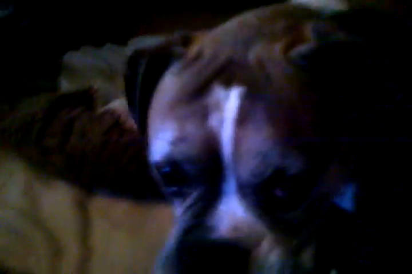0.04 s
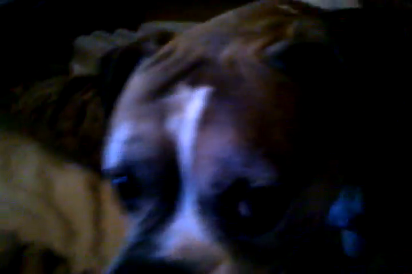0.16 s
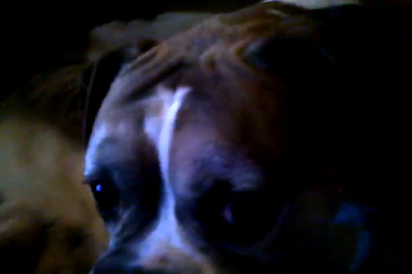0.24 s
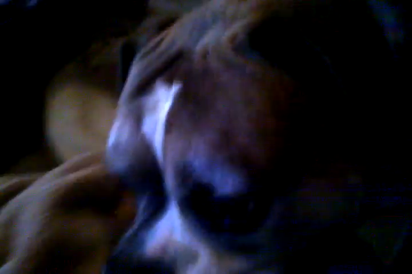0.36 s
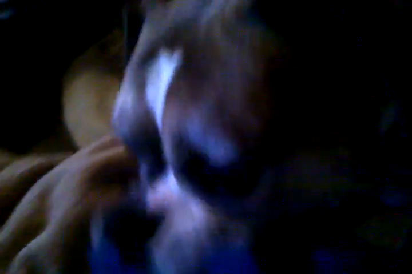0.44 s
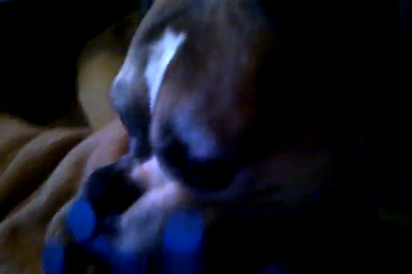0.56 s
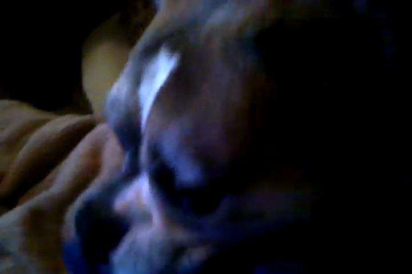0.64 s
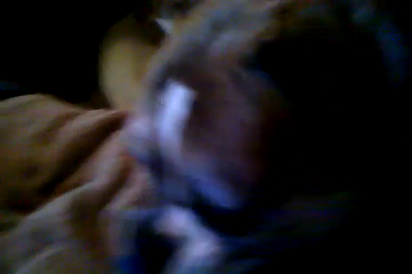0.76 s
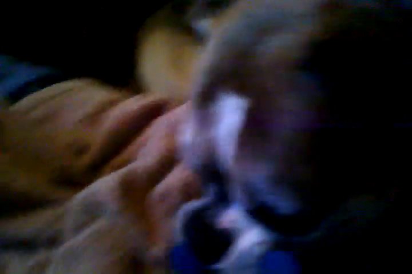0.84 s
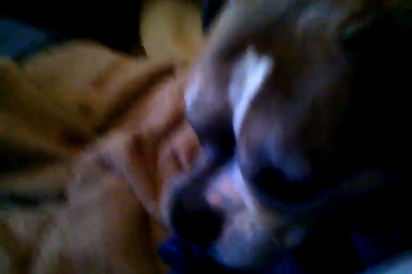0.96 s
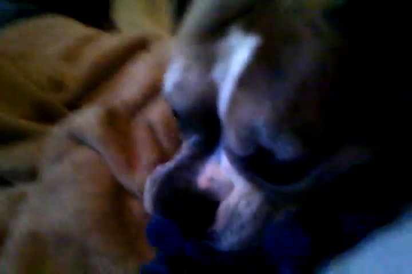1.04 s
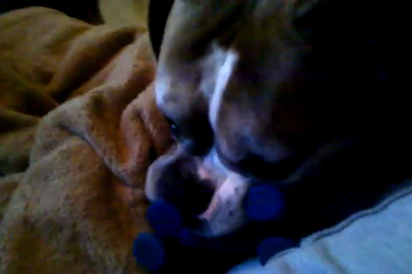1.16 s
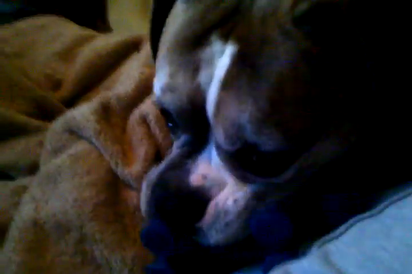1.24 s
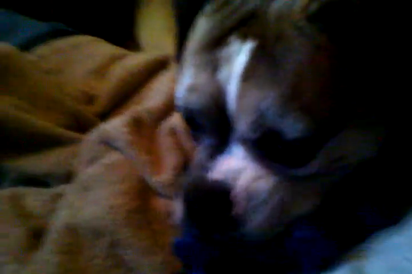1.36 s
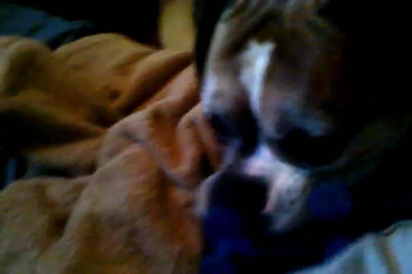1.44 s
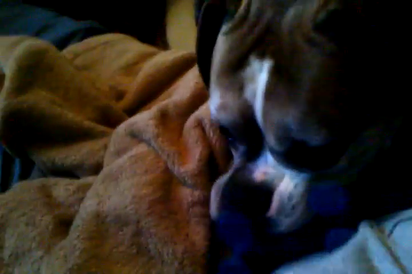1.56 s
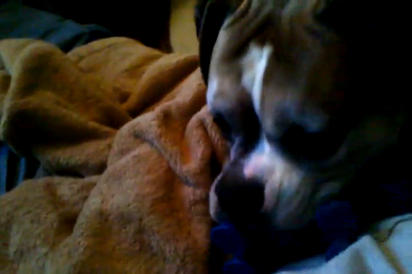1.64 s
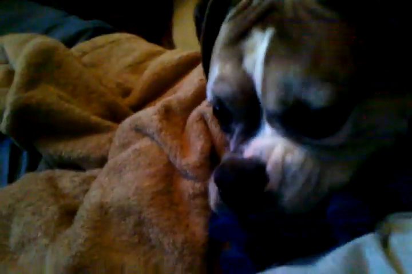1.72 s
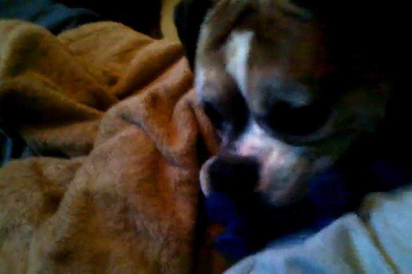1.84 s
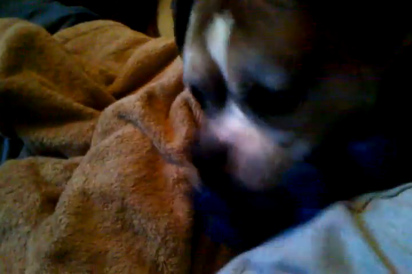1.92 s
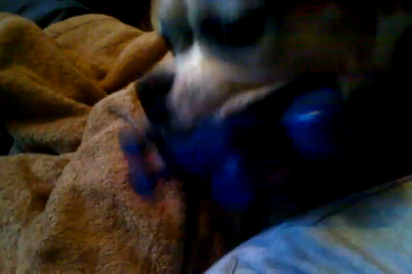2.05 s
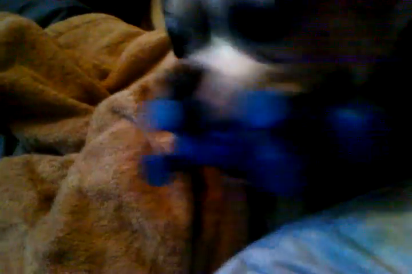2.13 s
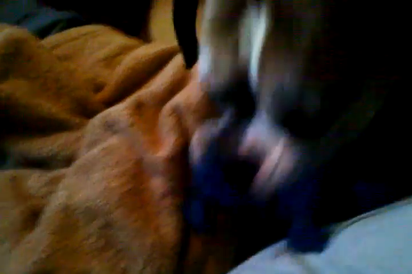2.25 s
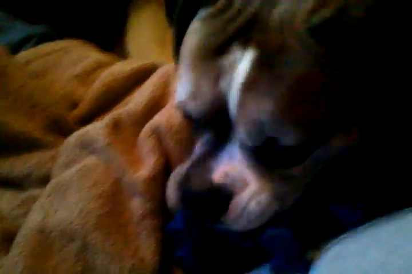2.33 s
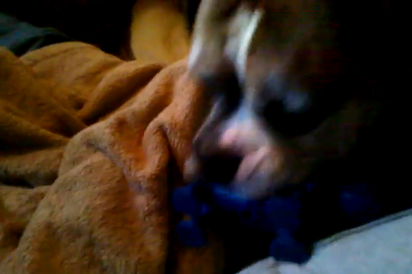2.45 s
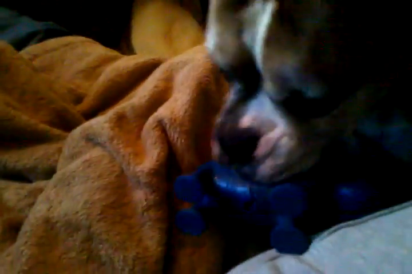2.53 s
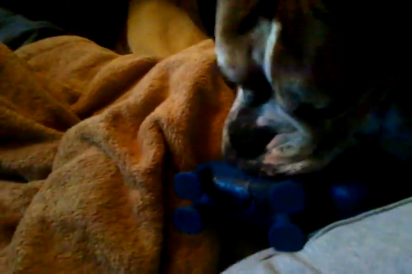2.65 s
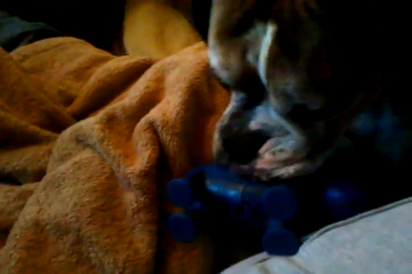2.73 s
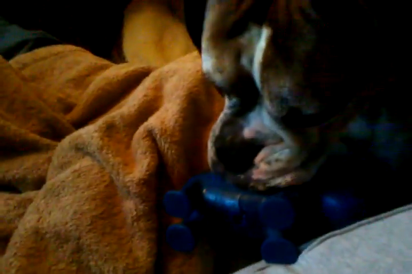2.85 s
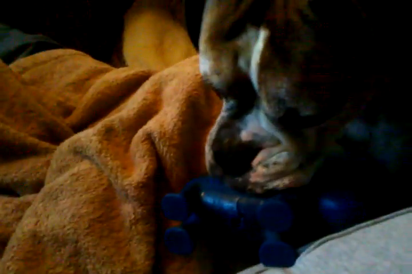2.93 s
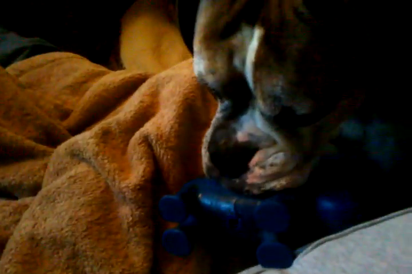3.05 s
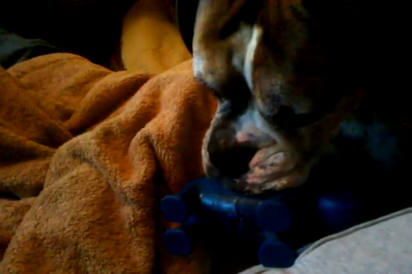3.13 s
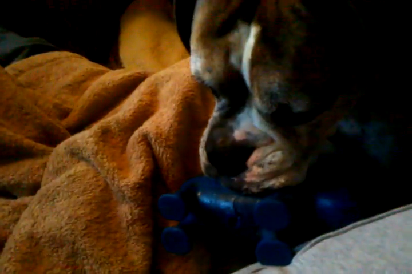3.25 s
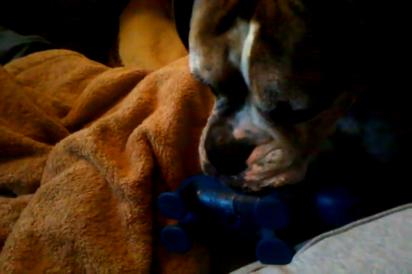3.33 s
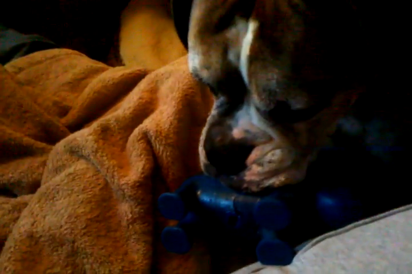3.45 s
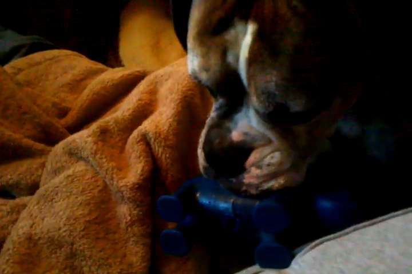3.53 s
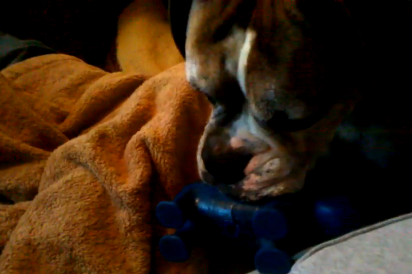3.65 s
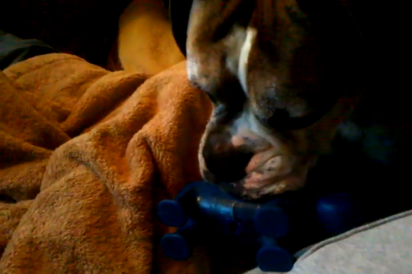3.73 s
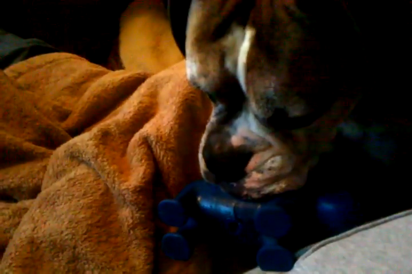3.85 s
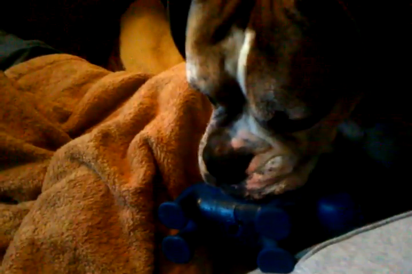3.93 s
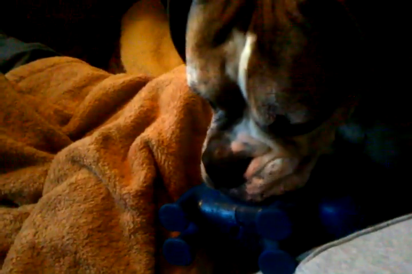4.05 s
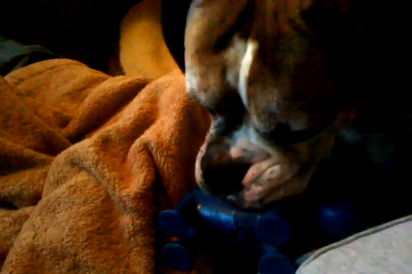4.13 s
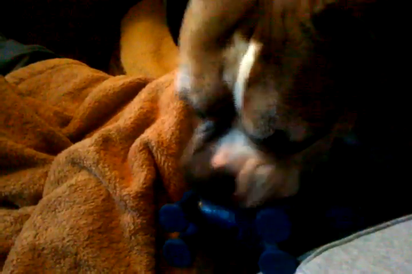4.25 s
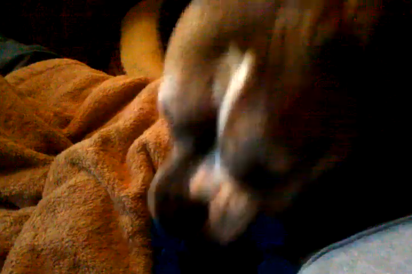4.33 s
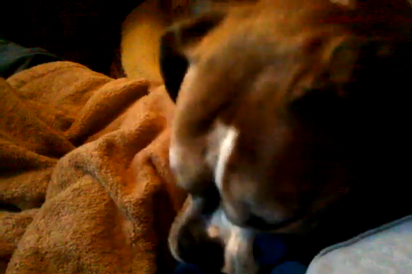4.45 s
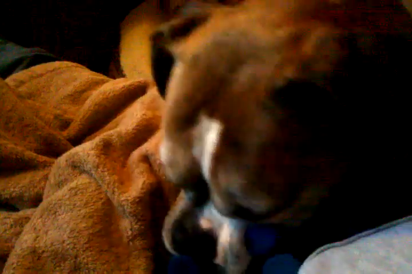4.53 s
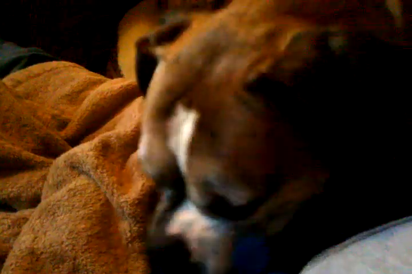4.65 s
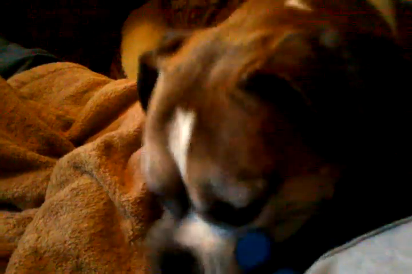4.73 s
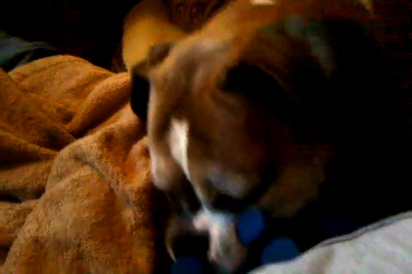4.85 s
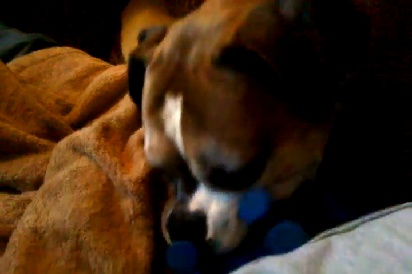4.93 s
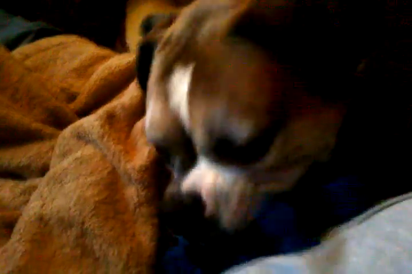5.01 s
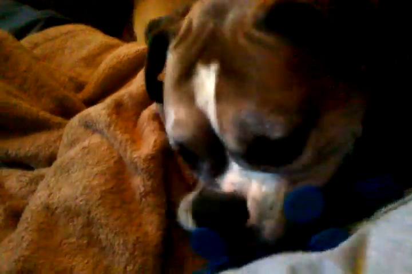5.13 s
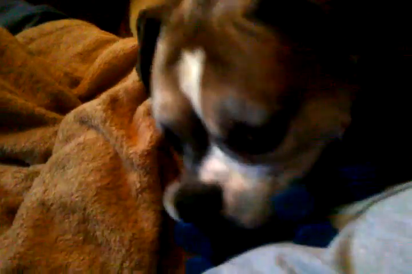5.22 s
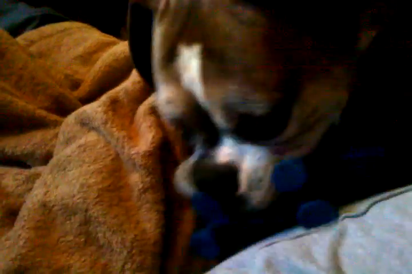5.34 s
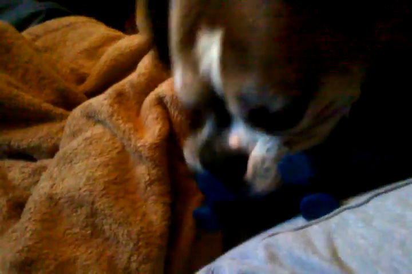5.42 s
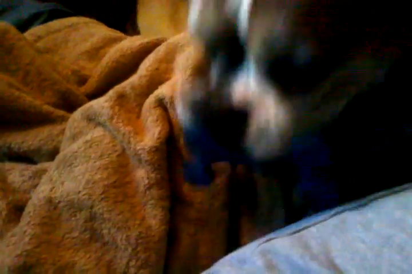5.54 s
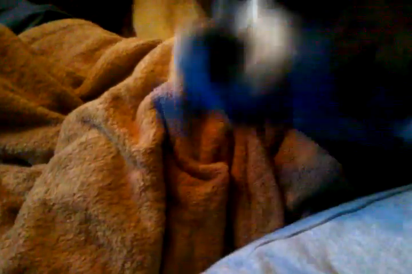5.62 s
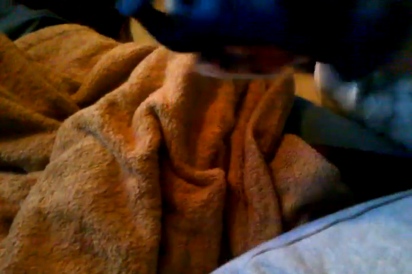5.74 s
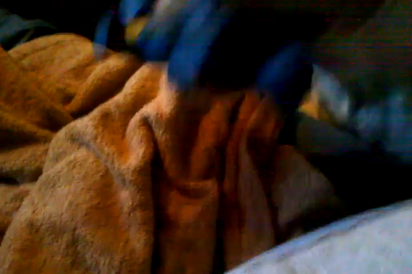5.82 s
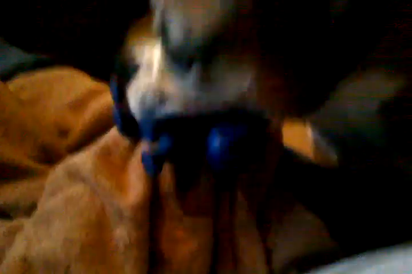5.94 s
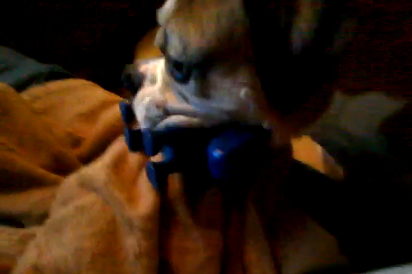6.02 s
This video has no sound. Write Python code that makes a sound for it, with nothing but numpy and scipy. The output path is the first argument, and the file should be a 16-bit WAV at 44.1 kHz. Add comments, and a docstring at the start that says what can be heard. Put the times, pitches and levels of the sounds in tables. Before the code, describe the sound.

A small, quiet room with low, steady still air, heard very close through a modest, band-limited microphone. In the first 0.3 seconds a dog gives tiny nose puffs and faint mouth ticks. From 0.7 to 2.0 it bites a rubber toy rapidly: nine short, shrill, nasal squeaks, each under a tenth of a second, some chirping upward then sagging. Hollow pops knock between them, strongest around 1.3 to 1.8, with fur hiss and cloth rumble. Wet ticks follow, then a weak squeak at 2.4 and a loud, higher one at 2.6. From 2.8 to 4.5 it is nearly silent, a faint low hum swelling late. From 4.6 to 5.5 a low, pulsing growl runs under four squeaks, at 4.7, 4.9, 5.05 and 5.3, two jumping sharply in pitch. A crisp tick, rustling, small sniffs and a soft hum finish by 6.

```python
"""In a quiet room, a dog lies on a blanket, heard close up, and bites a rubber squeaky toy.
Each bite drives air through the toy's reed, made from a stack of sine partials and leaking noise.
The hollow body pops with short falling rings; fur and cloth rustle as shaped, uneven noise.
The dog sniffs in noise puffs, its mouth ticks, and it growls low as pulses ring throat and mouth.
Still air lies under it all, and a faint low hum swells in twice."""
import sys
import numpy as np
from scipy import signal
from scipy.fft import rfft, irfft, next_fast_len
from scipy.io import wavfile
from scipy.ndimage import uniform_filter1d

SR = 44100
rng = np.random.default_rng(int(sys.argv[2]) if len(sys.argv) > 2 else 0)


def dump_mix(stems):
    """Bounce the given channels to the path in sys.argv[1] as a 16-bit WAV at rate SR."""
    frames = np.atleast_2d(stems).T  # one column per channel
    limited = np.clip(frames, -1, 1)  # hard clip at full scale
    pcm = np.round(limited * 32767).astype(np.int16)
    wavfile.write(sys.argv[1], SR, pcm)


N = 268128  # length in samples

# spectrum of the still room, shape only: pitch_hz, level_db (per Hz)
AIR_SPECTRUM = [(18, -79.5), (30, -48.5), (86, -13), (195, -10.5), (230, 0), (277, -17.5), (305, -7),
                (359, -20.5), (394, -11.5), (725, -15), (1030, -11.5), (1810, -22), (2630, -32.5),
                (6540, -32), (8080, -52.5), (10500, -77.5), (17800, -120)]
# air through the nose: start_s, level_db, length_s, low_noise_db (over the nose noise)
SNIFFS = [(0.0335, -47.5, 0.045, -16), (0.1207, -44, 0.021, -8), (0.182, -36, 0.036, -6),
          (4.647, -53, .01, 2), (5.3986, -53, 0.032, 11), (5.486, -55, 0.022, 9), (5.572, -52, 0.019, 1),
          (5.68, -63, 0.015, 14), (5.73, -49, 0.018, -1), (5.893, -53, 0.055, -24),
          (5.9394, -56, 0.017, -3)]
# spectrum of the nose noise, shape only: pitch_hz, level_db (per Hz)
NOSE_SPECTRUM = [(530, -36), (900, 6), (1390, -4), (1940, -15.5), (2370, -2), (3160, -99), (3460, -5),
                 (4000, 7), (5150, -3.5), (6940, 3), (7800, -41), (10100, -83), (17200, -120)]
# wet mouth ticks: start_s, level_db (top of the swell)
TICKS = [(0.2833, -50), (0.316, -44.5), (2.0416, -37), (2.138, -34), (2.2677, -39), (2.8898, -46),
         (4.2642, -47.5), (4.2998, -40), (5.3588, -25)]
# the toy's hollow wall snaps in or out: snap_s (sound follows a little later), level_db,
# ring_hz (where the pitch settles), fall_s (time to fall 60 dB)
POPS = [(0.195, -31.5, 314, 0.036), (0.755, -33, 202, 0.062), (1.003, -27, 240, 0.027),
        (1.212, -32, 348, 0.065), (1.294, -7, 382, 0.042), (1.553, -5, 347, 0.019),
        (1.664, -33.5, 421, 0.066), (1.709, -12, 355, 0.02), (1.766, -6, 345, 0.026),
        (1.791, -14.5, 345.6, 0.035), (2.026, -35, 288, 0.07), (2.267, -26, 426.8, 0.025),
        (2.569, -27, 400, 0.032), (4.659, -29.5, 218, 0.11)]
# spectrum of the high hiss of fur, shape only: pitch_hz, level_db (per Hz)
FUR_SPECTRUM = [(880, -43.5), (1500, -13), (1630, -23), (2180, -12), (2680, -19.5), (3810, -14.5),
                (4850, -29.5), (5840, -6.5), (6660, -7), (7800, -35), (10100, -62.5), (17200, -120)]
# spectrum of cloth rumble, shape only: pitch_hz, level_db (per Hz)
CLOTH_SPECTRUM = [(35, -42.5), (60, -15.5), (139, 0), (464, -3.5), (718, -2.5), (802, -1), (1100, -8.5),
                  (1430, -47), (2420, -120)]
# how loud the high hiss of fur, and of the broad sniff near 5.9 s, is before its uneven grains:
# time_s, level_db
HISS_CURVE = [(0.25, -67), (0.59, -70), (0.7, -66), (0.76, -47), (0.89, -45), (1.41, -51), (1.78, -41),
              (1.94, -58), (2.22, -70), (2.3, -57), (2.44, -46), (2.58, -45), (2.76, -62), (3.5, -72),
              (4.47, -73), (4.57, -56), (4.726, -53), (4.8, -63), (5.05, -46), (5.17, -55), (5.4, -48),
              (5.66, -54), (5.78, -50), (5.9, -39), (6.08, -60)]
# how loud the cloth rumble is before its uneven grains: time_s, level_db
CLOTH_CURVE = [(0.66, -66), (0.76, -52), (0.9, -45), (1.05, -44), (1.17, -53), (1.48, -56), (1.66, -47),
               (1.84, -54), (2.2, -64), (2.36, -50), (2.6, -56), (2.7, -80), (5.5, -80), (5.57, -51),
               (5.69, -48), (5.73, -54), (5.94, -49), (6.08, -60)]
# one bite curve a squeak, before waver, catch, sag and toy outlet:
# time_s, pitch_hz (of the reed), level_db (of the first partial)
SQUEAKS = [
    [(0.717, 1287, -24.9), (0.736, 1334, -21.1), (0.753, 1166, -29.0)],
    [(0.784, 1200, -27.1), (0.794, 1317, -27.3), (0.808, 1179, -25.9)],
    [(0.906, 1388, -16.6), (0.924, 1392, -20.8), (0.948, 1258, -39.0)],
    [(1.061, 1329, -23.5), (1.089, 1316, -22.0), (1.112, 1305, -23.4), (1.133, 1184, -27.6)],
    [(1.197, 1392, -12.8), (1.217, 1482, -13.9), (1.244, 1352, -19.9), (1.268, 1216, -28.9)],
    [(1.356, 1334, -18.5), (1.383, 1308, -17.1), (1.41, 1323, -19.3), (1.432, 1236, -20.7),
     (1.437, 1055, -25.7), (1.448, 1089, -25.0)],
    [(1.515, 1372, -15.4), (1.542, 1523, -10.8), (1.554, 1622, -9.9), (1.562, 1559, -11.4),
     (1.568, 1444, -15.1), (1.58, 1340, -18.6), (1.586, 1314, -15.3), (1.602, 1219, -26.2)],
    [(1.733, 1339, -17.3), (1.751, 1300, -17.1), (1.772, 1330, -18.7), (1.794, 1288, -15.5),
     (1.812, 1277, -17.0), (1.824, 1218, -24.8)],
    [(1.871, 1335, -9.0), (1.883, 1463, -10.2), (1.895, 1594, -11.0), (1.901, 1512, -8.0),
     (1.904, 1448, -15.5), (1.918, 1368, -15.2), (1.957, 1264, -22.2)],
    [(2.365, 1334, -31.9), (2.388, 1291, -27.3), (2.422, 1324, -22.9), (2.427, 1438, -21.4),
     (2.435, 1412, -22.6), (2.447, 1311, -22.1), (2.485, 1317, -24.8), (2.5, 1231, -33.5)],
    [(2.562, 1354, -14.3), (2.572, 1513, -7.9), (2.582, 1664, -12.2), (2.598, 1754, -9.0),
     (2.624, 1661, -14.2), (2.63, 1612, -11.8), (2.648, 1567, -13.0), (2.687, 1353, -16.3),
     (2.723, 1239, -26.2)],
    [(4.69, 1212, -14.5), (4.701, 1369, -11.0), (4.703, 1852, -13.4), (4.709, 1787, -11.2),
     (4.716, 1558, -17.1), (4.717, 1287, -14.4), (4.736, 1262, -14.9), (4.752, 1185, -23.4),
     (4.758, 1013, -19.0)],
    [(4.882, 997, -33.5), (4.89, 1135, -19.4), (4.896, 1181, -24.0)],
    [(5.049, 1251, -14.6), (5.059, 1415, -13.2), (5.061, 1984, -13.3), (5.071, 2148, -12.6),
     (5.079, 1763, -13.3), (5.081, 1282, -17.0), (5.093, 1262, -15.4), (5.098, 1012, -24.1),
     (5.105, 906, -21.1)],
    [(5.272, 1311, -17.3), (5.285, 1340, -12.7), (5.303, 1368, -12.2), (5.323, 1353, -13.6)],
]
# how the jaws shade each squeak, over the first partial, before the toy outlet:
# partial_2_db, partial_3_db, partial_4_db, partial_5_db, partial_6_db
BITE_SHADES = [(-1.3, 6.1, 8.1, 6.6, 6.0), (-2.4, 18.7, 17.2, 4.6, 7.4), (1.4, 14.7, -5.0, 9.3, 13.4),
               (-1.7, 12.7, 9.1, 5.5, 7.9), (-3.6, 8.3, -7.8, -1.6, -5.2), (-14.7, 6.1, 8.8, 0.0, -0.5),
               (-1.9, -0.1, -4.1, -4.0, -4.8), (-7.1, -6.3, 11.1, 7.7, -0.2),
               (-4.0, -5.1, -3.3, -0.3, -4.0), (5.7, 14.2, 14.8, 7.5, 5.5), (-7.0, -3.3, -1.9, -3.8, 4.6),
               (-1.7, -4.9, -4.8, -3.4, -8.2), (-4.8, -20.1, -24.7, -20.3, -21.3),
               (-0.8, -3.3, -4.0, -3.6, -0.5), (-5.5, -5.8, -8.0, -10.0, 9.3)]
# from toy outlet to microphone: pitch_hz, gain_db
OUTLET_PATH = [(900, 1.5), (1300, 0.5), (1800, 1), (2400, 3.35), (2900, -2.5), (3400, 0.2), (3900, 4.5),
               (4500, -13), (4900, -18), (5700, -1), (6300, 4), (6700, 6.5), (7200, -7.5), (7800, -26.5)]
# the reed starts flat and soft: pitch_share, pitch_time_s, level_db, level_time_s
REED_CATCH = (.17, .0013, -14, .0013)
# the reed sags as the air runs out: pitch_share, pitch_time_s, level_db, level_time_s
REED_SAG = (.12, .004, -14, .0028)
# low hum swells: start_s, end_s, pitch_hz, start_level_db, end_level_db (before the waver)
HUM_SWELLS = [(4.15, 4.56, 98, -70, -60), (5.55, 6.08, 111.5, -62, -54)]
# growl: time_s, pitch_hz (before jitter), level_db, mouth_opening_db (mouth over throat)
GROWL_CURVE = [(4.52, 82, -61, -2), (4.678, 72.5, -39.5, -3), (4.726, 76.5, -39, -6.5), (4.8, 75, -43, -9),
               (4.85, 75, -51, -8), (4.885, 75, -40, -12), (4.93, 75.5, -44, -9), (4.968, 79, -41, -6),
               (5.032, 105, -31.5, -8), (5.092, 97, -37.5, -6), (5.168, 76.4, -44, -5),
               (5.24, 74.5, -44, -4), (5.29, 75, -37, -7), (5.348, 88, -33.5, -4), (5.41, 83.5, -37.5, -5),
               (5.5, 74.7, -39.5, -2.5), (5.525, 75, -58, -2)]
# chest and throat resonances: pitch_hz, width_hz (of each of two passes), gain_db
THROAT_RINGS = [(90, 40, -11), (160, 89, -3), (250, 77, 1.5)]
# open mouth resonances: pitch_hz, width_hz (of each of two passes), gain_db
MOUTH_RINGS = [(450, 120, 0), (590, 130, -2), (840, 130, 1), (1190, 200, -26.5)]

AIR_DB = -53
THUMP_HZ, THUMP_DB = 180, -14  # the blanket under the toy gives with each pop
# air past the reed, under the strongest low partial; its extra burst before the reed catches
BREATH_DB, CHIFF_DB, CHIFF_S = -30, 20, 0.002
PARTIAL_TOP_HZ = 8000  # partials from here up stay silent
HUM_WAVER_DB, HUM_WAVER_PER_S = 3, 9
GROWL_ROUGHNESS = 0.33  # puffs of air against the slaps
ROOM_T60_S, ROOM_DB = 0.55, -28.5
NEAR_T60_S, NEAR_DB = 0.12, -21
TOP_HZ = 9300  # the last filter cuts above this


def undb(db):
    """Turns decibels into a plain gain."""
    return 10 ** (np.asarray(db) / 20)


def level(x, db=0):
    """Scales x to an rms level in dB."""
    return x * undb(db) / np.sqrt(np.mean(x ** 2))


def shade(table, hz):
    """Reads the dB of a pitch_hz, level_db table at hz, along a log pitch scale."""
    table_hz, db = np.transpose(table)
    return np.interp(np.log(np.maximum(hz, 1)), np.log(table_hz), db)


def noise(table):
    """Noise of rms 1 with the given spectrum."""
    size = next_fast_len(N)
    hz = np.arange(size // 2 + 1) * SR / size
    white_spectrum = rfft(rng.standard_normal(size))
    return level(irfft(white_spectrum * undb(shade(table, hz)), size)[:N])


def walk(rate):
    """A smooth random wander, from steps of 1 / rate s averaged twice; spread near 1."""
    step = int(SR / rate)
    held = np.repeat(rng.standard_normal(N // step + 1), step)
    smooth = uniform_filter1d(uniform_filter1d(held, step), step)
    return 1.3 * smooth[:N]


def ring(x, hz, width):
    """One resonance, gain 1 at its centre."""
    return signal.lfilter(*signal.iirpeak(hz, hz / width, fs=SR), x)


def ring_twice(x, hz, width):
    """The same resonance passed twice, so it is more selective."""
    return ring(ring(x, hz, width), hz, width)


def add(out, s, x):
    """Mixes x into out from time s."""
    i = int(s * SR)
    out[i:i + len(x)] += x[:N - i]


def play(rows, t):
    """Gain from a time_s, level_db curve, down at -120 dB outside it."""
    return undb(np.interp(t, *np.transpose(rows), -120, -120))


def still_air():
    """The still room is steady shaped noise whose level drifts slightly."""
    return undb(AIR_DB + 0.77 * walk(8)) * noise(AIR_SPECTRUM)


def sniffs():
    """Air rushing through the nose makes short puffs of noise."""
    out, t = np.zeros(N), np.arange(SR // 5) / SR
    nose_noise = noise(NOSE_SPECTRUM)
    low_noise = level(ring_twice(rng.standard_normal(N), 2250, 1200))
    for s, db, length_s, low_db in SNIFFS:
        at = (int(s * SR) + np.arange(len(t))) % N
        u = 2.6 * t / length_s
        puff = u * np.exp(1 - u) ** 1.2  # quick swell, slower fall
        add(out, s, undb(db) * puff * (nose_noise[at] + undb(low_db) * low_noise[at]))
    return out


def ticks(tick_s=0.0005):
    """Lips and teeth tick: a high tone swells and dies within a few thousandths of a second."""
    out, t = np.zeros(N), np.arange(SR // 5) / SR
    swell = np.e * t / tick_s * np.exp(-t / tick_s)
    tick = swell * np.sin(2 * np.pi * 6200 * t)
    for s, db in TICKS:
        add(out, s, undb(db) * tick)
    return out


def pops(lag_s=0.0017, glide=2.5, glide_s=0.0006, rise_s=0.0006, flutter=0.25):
    """The wall snaps with a high first swing that falls into the body's short, unsteady low ring."""
    out, t = np.zeros(N), np.arange(SR // 8) / SR
    shake = level(ring_twice(rng.standard_normal(N), 300, 250))
    thump = undb(THUMP_DB) * np.sin(2 * np.pi * THUMP_HZ * t)
    for s, db, hz, t60 in POPS:
        turns = hz * (t + glide * glide_s * (1 - np.exp(-t / glide_s)))
        own_shake = np.roll(shake, -int(s * SR))[:len(t)]
        unsteady = flutter * own_shake * np.minimum(t * hz / 2, 1)  # grows in over two swings
        swing = np.sin(2 * np.pi * turns) + thump + unsteady
        rise_and_fall = 1000 ** (-t / t60) * (1 - np.exp(-t / rise_s))
        add(out, s + lag_s, undb(db) * swing * rise_and_fall)
    return signal.sosfilt(signal.butter(2, 100, "high", fs=SR, output="sos"), out)


def blanket_and_hiss(t):
    """Fur, and a broad sniff near 5.9 s, hiss high and cloth rumbles, all in uneven grains."""
    hiss = noise(FUR_SPECTRUM) * undb(2.8 * walk(34))
    cloth = noise(CLOTH_SPECTRUM) * undb(2.5 * walk(35))
    return hiss * play(HISS_CURVE, t) + cloth * play(CLOTH_CURVE, t)


def squeaks(edge_s=0.001, flutter_db=1.0, waver=0.003):
    """The reed sings a clean stack that follows the bite pressure; a little air leaks past it."""
    out = np.zeros(N)
    flutter, drift = walk(140), walk(160)
    leak = noise([(600, -41)] + OUTLET_PATH + [(9000, -59.5)])
    for rows, shades in zip(SQUEAKS, BITE_SHADES):
        s, hz, db = np.transpose(rows)
        at = np.arange(int((s[0] - edge_s) * SR), int((s[-1] + edge_s) * SR))
        t = at / SR
        pitch = np.interp(t, s, hz) * (1 + waver * drift[at])
        loud_db = np.interp(t, s, db)
        for bend, away in ((REED_CATCH, t - s[0]), (REED_SAG, s[-1] - t)):
            share, bend_s, drop_db, drop_s = bend
            away = np.maximum(away, 0)  # seconds from that end of the squeak
            pitch = pitch * (1 - share * np.exp(-away / bend_s))
            loud_db = loud_db + drop_db * np.exp(-away / drop_s)
        turn = 2 * np.pi * np.cumsum(pitch) / SR
        chiff_db = CHIFF_DB * np.exp(-(t - t[0]) / CHIFF_S)
        breath_db = BREATH_DB + max(0, *shades[:4]) + chiff_db
        stack = undb(breath_db) * leak[at]
        for k, over_db in enumerate((0, *shades), 1):
            # each partial reads the flutter half a second further on
            own_flutter = flutter_db * flutter[(at + k * SR // 2) % N]
            gain = undb(over_db + shade(OUTLET_PATH, k * pitch) + own_flutter)
            heard = k * pitch < PARTIAL_TOP_HZ
            stack = stack + heard * gain * np.sin(k * turn + k * k * np.pi / 5)
        gate = np.clip(np.minimum(t - t[0], t[-1] - t) / edge_s, 0, 1)
        out[at] += stack * gate * undb(loud_db)
    return out


def hum(t, fade_s=0.03):
    """A soft low tone whose level wavers."""
    out = np.zeros(N)
    waver = undb(HUM_WAVER_DB * walk(HUM_WAVER_PER_S))
    for s, end, hz, db, end_db in HUM_SWELLS:
        fade = np.clip(np.minimum(t - s, end - t) / fade_s, 0, 1)
        swell = undb(np.interp(t, (s, end), (db, end_db)))
        out += np.sin(2 * np.pi * hz * t) * fade * swell
    return out * waver


def resonate(source, modes):
    """Side-by-side resonances of a cavity, added with alternating sign, at rms 1."""
    total = np.zeros(N)
    for k, (hz, width, db) in enumerate(modes):
        total += (-1) ** k * undb(db) * ring_twice(source, hz, width)
    return level(total)


def growl(t, jitter=0.023, scatter_db=2.6):
    """Slow vocal fold slaps, with a puff of air after each, ring the throat and the mouth."""
    s, hz, db, open_db = np.transpose(GROWL_CURVE)
    turns = np.cumsum(np.interp(t, s, hz) * (1 + jitter * walk(70))) / SR
    slaps = np.diff(np.floor(turns), prepend=0) * undb(scatter_db * walk(70))  # one per whole turn
    puffs = level(np.exp(-(turns % 1) / 0.3) * rng.standard_normal(N))
    folds = level(slaps) + GROWL_ROUGHNESS * puffs
    throat = resonate(folds, THROAT_RINGS)
    mouth = resonate(folds, MOUTH_RINGS) * undb(np.interp(t, s, open_db))
    return (throat + mouth) * undb(np.interp(t, s, db, -120, -120))


def room(x, gap_s=0.004, treble_share=0.79):
    """Quick returns from things close by, then a faint diffuse tail with shorter treble."""
    t = np.arange(int(0.8 * SR)) / SR
    white = rng.standard_normal(len(t))
    dull = signal.lfilter(*signal.butter(2, 2500, fs=SR), white)
    treble = white - dull
    far = dull * 1000 ** (-t / ROOM_T60_S) + treble * 1000 ** (-t / (treble_share * ROOM_T60_S))
    near = white * 1000 ** (-t / NEAR_T60_S)
    tail = np.zeros(len(t))
    for part, db in ((far, ROOM_DB), (near, NEAR_DB)):
        tail += undb(db) * part / np.sqrt(np.sum(part ** 2))
    return signal.fftconvolve(x, tail * (t > gap_s))[:N]


def scene():
    """Dog and toy with their room echo, over rustle and hiss, the still air and the hum."""
    t = np.arange(N) / SR
    dog = sniffs() + ticks() + pops() + squeaks() + growl(t)
    return (dog + room(dog) + blanket_and_hiss(t) + still_air() + hum(t))[None]


def record(dry, ceiling=0.8, knee=8.0, offset=0.03, leak=5.0):
    """A 16 kHz converter overloads on the loudest squeaks, which folds a rasp between the partials;
    its loose output filter leaks a mirror of the treble above the fold at 8 kHz."""
    up, down = 160, 441  # 44100 Hz to 16000 Hz
    x = signal.sosfilt(signal.butter(3, 60, "high", fs=SR, output="sos"), dry)
    x = signal.resample_poly(x, up, down, axis=1, window=("kaiser", 8.5))
    x = x / (1 + np.abs((x - offset) / ceiling) ** knee) ** (1 / knee)  # slightly lopsided limit
    x = signal.resample_poly(x, down, up, axis=1, window=("kaiser", leak))[:, :N]
    x = np.pad(x, ((0, 0), (0, N - x.shape[1])))
    x = signal.sosfilt(signal.butter(6, 8400, fs=SR, output="sos"), x)
    return signal.sosfilt(signal.ellip(10, 0.2, 90, TOP_HZ, fs=SR, output="sos"), x)


dry = scene()
out = record(dry)
dump_mix(out)
```